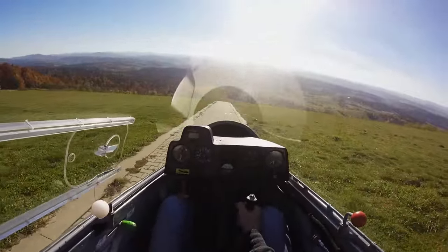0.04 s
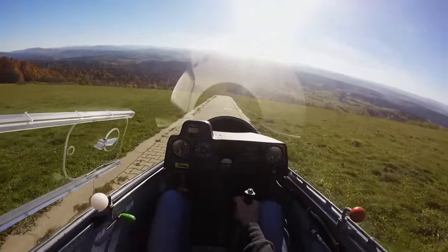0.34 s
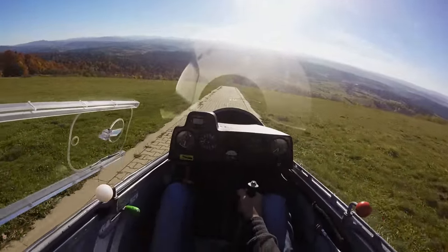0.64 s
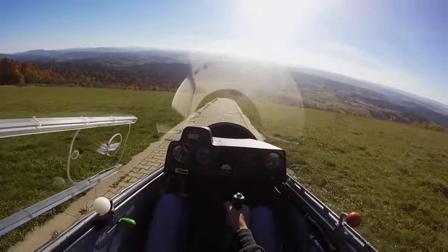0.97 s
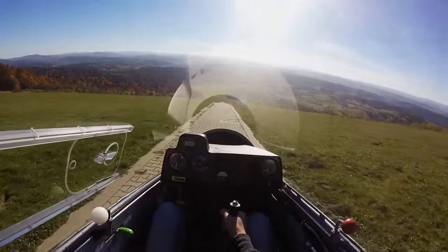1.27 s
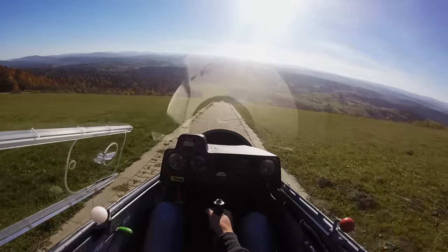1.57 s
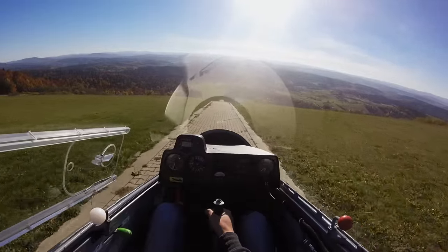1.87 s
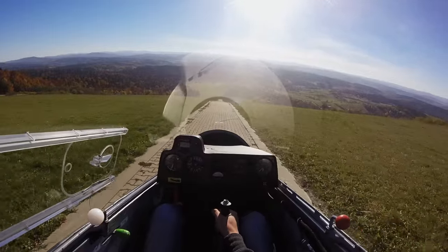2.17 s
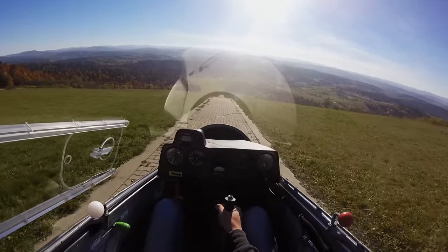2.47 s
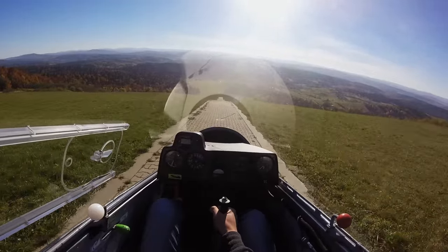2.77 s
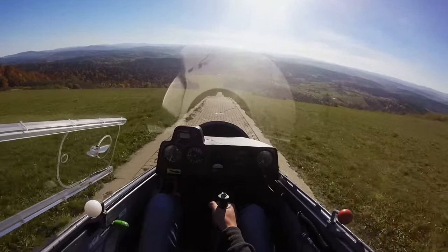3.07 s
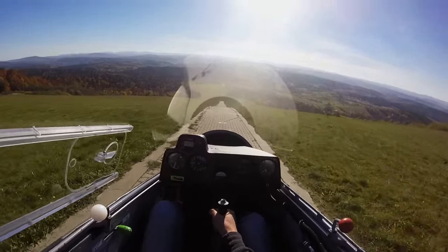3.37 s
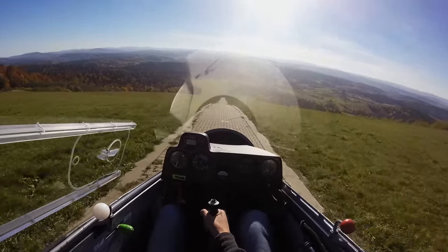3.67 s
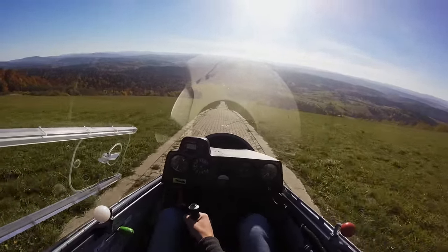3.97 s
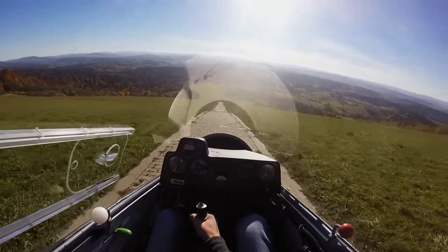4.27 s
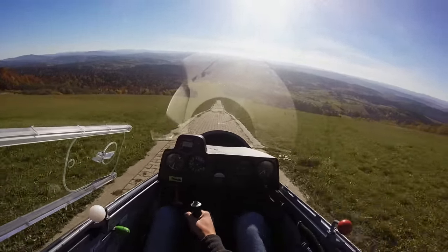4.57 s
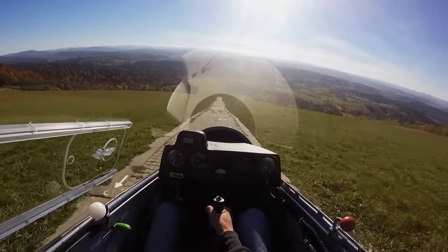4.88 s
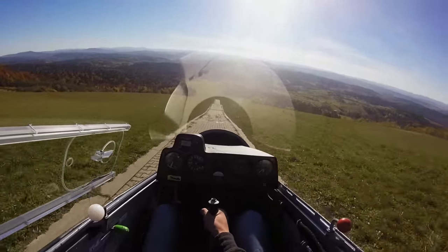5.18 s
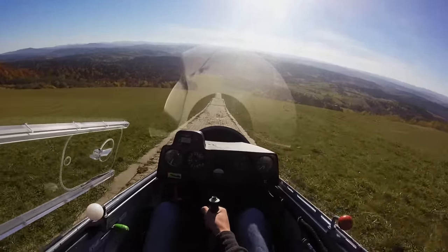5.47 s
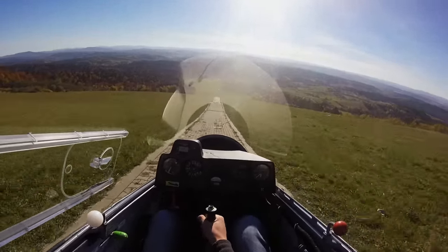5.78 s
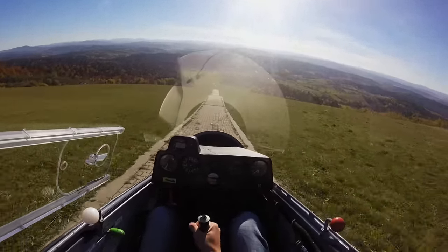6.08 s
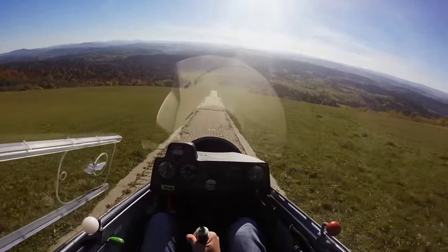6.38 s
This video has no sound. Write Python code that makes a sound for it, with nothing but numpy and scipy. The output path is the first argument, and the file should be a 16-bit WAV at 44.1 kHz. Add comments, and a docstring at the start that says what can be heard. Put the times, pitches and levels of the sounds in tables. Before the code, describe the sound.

From the pilot's seat, a glider's takeoff run on turf is a deep, boxy rumble with a wheel hum that rises as it speeds up. A quick, uneven series of knocks and rattles shakes the shell at first, with brief chirps from the joints. After a heavy jolt midway, the ride turns to softer thumps and light rod clicks, with one more sharp knock late on. A faint hiss of grass and wind lies underneath.

```python
"""A glider's wheel rolls ever faster over bumpy grass, heard from inside the cockpit.
The turf forces the hollow hull into resonance, and the uneven tyre drones at a rising pitch.
On bumps, impacts excite the modes of the nose and of a loose fitting, and joints squeak by stick-slip.
Control rods clack, a small metal part jingles, and a thin trill sounds early in the roll.
Behind it all, grass and air hiss past the shell as broadband noise."""
import sys
import numpy as np
from scipy import signal
from scipy.fft import rfft, irfft
from scipy.io import wavfile
from scipy.ndimage import uniform_filter1d, minimum_filter1d

SR = 44100
rng = np.random.default_rng(int(sys.argv[2]) if len(sys.argv) > 2 else 0)


def bounce(signal):
    """Save signal as a 16-bit WAV file at the path given by the first command-line argument."""
    frames = np.transpose(np.atleast_2d(signal))
    limited = np.clip(frames, -1, 1)
    pcm = np.round(limited * 32767).astype(np.int16)
    wavfile.write(sys.argv[1], SR, pcm)


N = 288414
T = np.arange(N) / SR

# Rotation of the wheel: time_s, rate_hz
WHEEL_SPEED = [(0, 14), (1, 16), (2, 20.8), (2.8, 23.2), (3.5, 26.2), (4.2, 28.8), (5, 32.3), (5.9, 36.9),
               (6.54, 41.4)]
# Unevenness of the tyre: harmonic_number, level_db
TYRE_HARMONICS = [(2, 0.5), (3, -1.5), (4, -2), (5, -15), (6, -15), (7, -4.5), (9, -1)]
# Response of the fuselage to the tyre: frequency_hz, gain_db
FUSELAGE_RESPONSE = [(28, -10.5), (50, -8.5), (57, -1), (64, -2), (72, -6), (80, -14), (98, -19.5),
                     (110, -3), (125, 0.5), (140, -8.5), (165, -6), (190, -20), (232, -3.5), (246, -8),
                     (253, 0), (260, 1), (266, -9), (370, -27.5)]
# Roughness of the turf: time_s, level_db
TURF_ROUGHNESS = [(0, 5), (.4, 3), (.65, 3.5), (.92, -3.5), (1.5, 3), (2.1, 1), (2.6, 3), (3.28, 3.5),
                  (3.55, 3.5), (4.1, 2.5), (4.45, 3), (4.75, 1), (5.1, 2), (5.7, 3), (6.1, 0.5), (6.54, 2)]
# Drumming of the floor and rush of air: time_s, floor_db, air_db
FLOOR_AND_AIR = [(0, -23.5, -45.5), (.8, -26.5, -46.5), (1.1, -29, -52), (1.6, -27.5, -50),
                 (2.3, -25, -49.5), (3, -26.5, -48.5), (3.7, -24, -45), (4.3, -24.5, -45.5),
                 (5, -25.5, -48), (5.8, -27.5, -45.5), (6.54, -26.5, -45.5)]
# Hollows that unload the wheel: centre_s, half_length_s, depth_db
HOLLOWS = [(2.83, .02, 7), (3.147, 0.028, 8.5), (3.302, 0.031, 10.5), (3.82, 0.034, 3), (3.947, 0.011, 8),
           (4.308, 0.03, 6), (5.09, 0.03, 7.5), (5.507, .025, 4), (5.76, 0.063, 2), (6.12, 0.017, 3),
           (6.29, 0.023, 4)]
# Soft hummocks under the main wheel: start_s, length_s, hull_db, cabin_db, walls_db, grass_db
HUMMOCKS = [(0.647, 0.024, -18, -20, -19, -62), (2.893, 0.049, -10, -42, -19, -90),
            (3.702, 0.024, -18, -35, -10.5, -65), (3.865, 0.018, -12.5, -32, -15.5, -61),
            (3.976, 0.22, -21, -30, -19, -63), (4.587, 0.042, -15.5, -23, -17, -55),
            (4.71, 0.02, -12.5, -15, -30, -53), (5.563, 0.052, -21, -16, -40, -57.5),
            (6.24, 0.016, -15.5, -30, -31, -64.5), (6.324, 0.069, -19, -26, -17, -62)]
# Hard bumps that bring the nose down:
# start_s, length_s, hull_db, cabin_db, walls_db, grass_db, judder_db, buzz_lead_s, buzz_db
BUMPS = [(0.011, 0.011, -26, -15.5, -38, -47, -21.5, 0.019, -27),
         (0.214, 0.11, -14.5, -24.5, -27.5, -57, -28.5, 0.063, -36),
         (0.472, 0.043, -14.5, -20, -18, -54.5, -30, 0.03, -42),
         (0.587, 0.046, -28, -17, -39, -51, -25.5, .003, -34.5),
         (0.768, 0.042, -11.5, -14.5, -17.5, -56.5, -21, 0.0071, -30),
         (0.955, 0.056, -15, -20, -28, -61, -27.5, 0.032, -45.5),
         (1.148, 0.033, -21, -19, -18.5, -48.5, -21, 0.0061, -39),
         (1.343, 0.032, -19, -17, -38, -52.5, -23, 0.055, -37),
         (1.624, 0.055, -15, -16, -21, -53, -27.5, 0.039, -36),
         (1.884, 0.059, -15.5, -22, -20, -51, -21, 0.037, -36.5),
         (2.216, 0.044, -25, -18, -20, -51, -24, 0.036, -33.5),
         (2.444, 0.15, -16.5, -39.5, -20.5, -57, -29, .003, -36.5),
         (2.689, 0.069, -11.5, -23, -40, -55.5, -24, 0.029, -34),
         (3.367, 0.041, -8, -23, -21, -48.5, -23, .004, -31),
         (5.239, 0.07, -28, -11.5, -15, -54.5, -22, 0.027, -35.5)]

# Resonances of each part or sound: frequency_hz, bandwidth_hz, gain_db
HULL_MODES = [(29, 6.5, -10), (45.7, 22, -3), (55.2, 19.7, 4)]
CABIN_MODES = [(122.5, 37, -1), (140.8, 20, -6.5), (164.8, 26, -5.5)]
WALL_MODES = [(226.9, 16.6, 2), (252.8, 13.7, 4), (286.1, 38, -5)]
FLOOR_MODES = [(379.3, 38, 7), (421, 17, 8.5), (502.7, 59.4, 8), (550.4, 45, 4), (642, 60.4, 6),
               (591, 8.7, 9.5), (791, 20, -12), (984, 23, -13.5)]
NOSE_MODES = [(408, 39, -10), (486, 93, -14.5), (603, 36, -1), (637.4, 20, 2), (700.5, 22, -0.5),
              (764, 16, -9.5)]
SHELL_CREAK_MODES = [(1520, 410, 1), (2023, 160, 3.5), (3440, 190, -19.5)]
SHELL_CRACK_MODES = [(882, 33, 13.5), (1017, 91, 6), (1440, 310, -6), (1740, 130, -5.5), (2350, 360, -14.5)]
FITTING_MODES = [(990, 150, -17.5), (1108, 41, 9.5), (1149, 15, 4), (2050, 84, -11.5)]
ROD_MODES = [(1560, 510, -2.5), (1950, 380, 27.5), (2160, 270, 1), (3200, 920, 8.5), (3506, 80, 20),
             (3920, 450, -0.5), (4140, 320, 12), (6460, 350, -1)]
METAL_MODES = [(4300, 470, 2), (6200, 150, 11.5), (8100, 940, 5.5), (9800, 1200, -4.5), (10860, 220, -9.5),
               (11500, 310, -20.5), (12300, 800, -15)]
TRILL_MODES = [(6460, 270, -18), (10700, 330, -6), (11200, 300, -9)]
BEARING_MODES = [(5590, 300, 0)]

# Knocks of the nose, some of them faint: start_s, level_db, tuning_ratio
KNOCKS = [(.028, -15, 1.07), (.063, -24.5, 1.15), (.216, -13.5, 0.92), (.270, -19.5, 1.08),
          (.295, -16.5, 0.92), (.488, -18, 1), (.588, -14.5, 1), (.768, -14, 0.97),
          (.789, -10.5, 0.94), (.960, -12, 0.95), (1.152, -12.5, 0.92), (1.347, -13.5, 1.07),
          (1.627, -17, 1), (1.635, -17, 1.06), (1.888, -14.5, 0.96), (2.222, -22, 1.2),
          (2.449, -17, 1.01), (2.702, -15, 1.06), (2.732, -18.5, 1), (3.273, -27, 0.96),
          (3.345, -26, 1.2), (3.367, -16, 0.95), (3.381, -10.5, 0.97), (3.405, -21, 1.1),
          (3.716, -23.5, 1), (5.247, -14.5, 0.86), (5.266, -25, 1.24), (5.277, -15, 1.14)]
# Taps of the fitting on its stop: start_s, level_db
TAPS = [(0.217, -36), (0.588, -37), (.763, -33), (0.789, -29.5), (0.935, -47), (1.294, -41), (1.626, -34),
        (1.843, -37), (1.919, -30), (2.186, -36), (2.221, -33), (2.438, -44), (2.703, -35), (2.727, -29.5),
        (3.367, -31), (3.385, -25.5), (5.247, -33), (5.277, -36)]
# Slips of the joints: peak_s, half_length_s, pitch_hz, level_db, overtones_db
SQUEAKS = [(0.866, 0.0078, 652, -17, -10), (1.696, 0.0048, 675, -15, -3), (2.06, 0.0088, 700, -12.5, 0.5),
           (3.973, 0.007, 1400, -49, -13), (4.087, 0.0045, 1340, -35.5, 0.5),
           (4.329, 0.0043, 1320, -39, -6), (4.451, 0.0032, 1380, -38, 0), (5.614, 0.0091, 1346, -44, -1),
           (6.376, 0.007, 1390, -40.5, -4)]
# Spectrum of a squeak: harmonic_number, level_db
SQUEAK_HARMONICS = [(1, 3), (2, -21), (3, -21), (4, -37.5), (5, -43)]
# Clacks of the control rods: start_s, length_s, level_db
CLACKS = [(.322, 0.084, -47.5), (.434, 0.0042, -44), (.796, .008, -52), (1.004, .0049, -44),
          (1.062, .02, -47.5), (1.168, 0.02, -40.5), (1.197, 0.0069, -35.5), (1.257, 0.004, -30.5),
          (1.672, 0.0043, -35), (1.732, 0.004, -35), (1.922, 0.011, -50), (2.224, 0.046, -44.5),
          (2.757, 0.0036, -41.5), (2.917, 0.0047, -43), (2.982, .004, -55), (3.198, .008, -49),
          (3.333, .004, -55), (3.381, 0.008, -41), (3.439, .0046, -30.5), (3.496, 0.0091, -34),
          (3.56, 0.0033, -40.5), (3.627, 0.025, -47.5), (3.912, 0.0074, -44), (4.179, .005, -49),
          (4.259, 0.007, -47.5), (4.401, 0.0064, -51), (4.498, 0.0052, -43), (4.664, .005, -50.5),
          (4.77, .006, -50), (4.955, .02, -51.5), (5.247, 0.0065, -34), (5.276, .005, -44),
          (5.335, 0.011, -46.5), (5.413, .005, -48), (5.477, 0.0041, -46.5), (5.762, 0.014, -49),
          (6.16, 0.0064, -43), (6.37, 0.026, -46)]
# Jingles of the metal part: start_s, level_db
JINGLES = [(.075, -64), (0.383, -58), (.435, -58), (1.177, -54), (1.259, -57), (1.385, -64), (2.25, -65),
           (3.546, -62), (4.497, -57), (4.597, -63), (5.142, -63), (5.379, -60)]
# Spectra of scratching grass and of air past the canopy: frequency_hz, density_db
GRASS_SPECTRUM = [(900, -8), (1700, -1), (2100, 12), (2550, 0), (3500, 1), (4200, -3.5), (4700, -11),
                  (6400, -11), (7400, -17), (11000, -27.5), (16000, -52)]
AIR_SPECTRUM = [(600, -1), (1000, 2.5), (1200, -3), (1360, 3.5), (1850, -1.5), (2200, -3.5), (2480, -10),
                (2750, -15.5), (3300, -14.5), (6100, -26), (6500, -22), (7100, -30), (11000, -34),
                (16000, -63.5)]
# Rubbing of the wheel bearing: time_s, level_db
BEARING_LEVEL = [(0, -86), (1.7, -81), (2.2, -72), (3.8, -72), (4.5, -76), (6.54, -80)]

REFERENCE_HZ = 27.9   # wheel rate at which speed adds 0 dB
# Response to speed and turf: base_db, speed_doubling_db, roughness_share
HULL_LAW, CABIN_LAW, WALLS_LAW = (-22.5, 0.97, 1), (-21.5, 4.2, 0.62), (-21, 4.3, 0.82)
GRASS_LAW, DRONE_LAW = (-65, -0.8, 0.58), (-19.5, 4.3, 0.28)
# Envelope of a jolt: delay_s, rise_s, fade_s
HULL_SWELL, SHELL_SWELL, GRASS_SWELL = (0.05, 0.036, 0.012), (0.025, 0.015, 0.01), (0.018, 0.039, 0.058)


def rolling_wheel(wheel_hz, hull_db, cabin_db, walls_db, floor_db):
    """Forced vibration: tufts kick the wheel and the airframe resonates; tyre and bearing sound too."""
    wheel_angle = 2 * np.pi * np.cumsum(wheel_hz * (1 + 0.00497 * drift(14))) / SR
    kicks = rms_one(grains(45 * wheel_hz, spread_db=4.5))
    # Each heave of the hull shakes the whole airframe harder.
    load_db = 0.14 * (hull_db - uniform_filter1d(hull_db, size=SR // 3))
    hull = steady(band(resonate(kicks, HULL_MODES), 25.4, 74.1, order=4), span_s=0.065)
    cabin = steady(band(resonate(kicks, CABIN_MODES), 104.6, 183.2, order=4), span_s=0.074)
    walls = steady(band(resonate(kicks, WALL_MODES), 205, 322.3, order=4), span_s=0.091)
    tyre_slaps = grains(22 * wheel_hz, spread_db=4) * from_db(3.2 * np.cos(wheel_angle))
    floor = steady(band(resonate(tyre_slaps, FLOOR_MODES), 272, 1055, order=6), span_s=0.044)
    rumble = (from_db(hull_db - 0.5) * hull
              + from_db(cabin_db + load_db - 1.9) * cabin
              + from_db(walls_db + load_db - unloading_db() - 0.83) * walls
              + from_db(floor_db + load_db) * floor)
    return rumble + tyre_drone(wheel_angle, wheel_hz) + bearing_chirp(wheel_angle)


def tyre_drone(wheel_angle, wheel_hz):
    """Periodic forcing: each harmonic of the uneven tyre swells as it crosses a fuselage resonance."""
    response_hz, response_db = np.transpose(FUSELAGE_RESPONSE)
    tone = 0
    for harmonic, db in TYRE_HARMONICS:
        wavering_db = db + np.interp(harmonic * wheel_hz, response_hz, response_db) + 2.9 * drift(14)
        tone += from_db(wavering_db) * np.sin(harmonic * wheel_angle + rng.uniform(0, 2 * np.pi))
    level_db = shaking_db(DRONE_LAW, wheel_hz) - 0.76 * unloading_db()
    return from_db(level_db) * np.sqrt(2) * tone


def ride_levels_db(wheel_hz):
    """Incoherent addition: shaking and jolts sum in power, for hull, cabin, walls and grass in turn."""
    parts = [(HULL_LAW, HULL_SWELL), (CABIN_LAW, SHELL_SWELL),
             (WALLS_LAW, SHELL_SWELL), (GRASS_LAW, GRASS_SWELL)]
    return [10 * np.log10(from_db(shaking_db(law, wheel_hz)) ** 2 + jolt_power(part, *swell))
            for part, (law, swell) in enumerate(parts)]


def shaking_db(law, wheel_hz):
    """Power law: steady vibration scales with speed, and grows with the roughness of the turf."""
    base_db, doubling_db, roughness_share = law
    turf_db, = in_time(TURF_ROUGHNESS)
    return base_db + doubling_db * np.log2(wheel_hz / REFERENCE_HZ) + roughness_share * turf_db


def jolt_power(part, delay_s, rise_s, fade_s):
    """Transient response: at each bump or hummock a part's vibration swells, holds and decays."""
    power = 0
    for start_s, length_s, *levels_db in BUMPS + HUMMOCKS:
        t = T[::32] - start_s - delay_s
        swell = np.exp(-(np.minimum(t, 0) / rise_s) ** 2 / 2 - np.maximum(t - length_s, 0) / fade_s)
        power += (from_db(levels_db[part]) * swell) ** 2
    return np.interp(T, T[::32], power)


def unloading_db():
    """Reduced contact force: the hum sinks while the wheel skims a hollow."""
    return sum(depth_db * np.exp(-((T - centre_s) / half_s) ** 2 / 2)
               for centre_s, half_s, depth_db in HOLLOWS)


def nose_knocks(touch_lead_s=0.00468, rebound_s=0.0085):
    """Impulse response: three quick pulses ring the airframe's modes, heard as a knock or faint thud."""
    out = np.zeros(N)
    for start_s, db, tuning in KNOCKS:
        *mode_scatter, rebound_scatter = rng.standard_normal(len(NOSE_MODES) + 1)
        delays_s = np.array([0, touch_lead_s, touch_lead_s + rebound_s * np.exp(0.15 * rebound_scatter)])
        contacts = np.zeros(SR // 5)
        contacts[(delays_s * SR).astype(int)] = 0.4, 1, 0.79   # touch, blow, rebound
        nose_modes = [(hz * tuning, width_hz, gain_db + 2 * scatter)
                      for (hz, width_hz, gain_db), scatter in zip(NOSE_MODES, mode_scatter)]
        parts = [(band(ring(contacts, nose_modes), 388, 754.5, order=5), 0),
                 (band(ring(contacts, FLOOR_MODES), 254, 485), -8),
                 (band(ring(contacts, FITTING_MODES), 855, 1310), -27.5),
                 (resonate(contacts, SHELL_CRACK_MODES), crack_db(start_s))]
        for sound, part_db in parts:
            add(out, start_s - 0.001 - touch_lead_s, at_level(sound, db + part_db + 0.84, span_s=0.016))
    return out


def bump_judder(onset_s=0.012):
    """Repeated impact: bumps shake nose, floor, shell and rods; the flexing frame buzzes the fitting."""
    blows, buzzes = [], []
    for start_s, length_s, *_, judder_db, buzz_lead_s, buzz_db in BUMPS:
        blows.append((start_s + onset_s, max(length_s - onset_s, 0), judder_db))
        buzzes.append((start_s - buzz_lead_s, buzz_lead_s + length_s, buzz_db))
    cracks = [(start_s, length_s, db + crack_db(start_s)) for start_s, length_s, db in blows]
    nose = chatter(blows, lambda x: band(ring(x, NOSE_MODES), 372, 836, order=5),
                   per_s=260, first=0.27, rise_s=0.001, fade_s=0.027, lead_s=0.00017)
    thud = chatter(blows, lambda x: band(resonate(x, FLOOR_MODES), 282, 483),
                   per_s=560, first=1, rise_s=0.0011, fade_s=0.034, lead_s=-0.002)
    creak = chatter(blows, lambda x: resonate(x, SHELL_CREAK_MODES),
                    per_s=560, first=0.59, rise_s=0.004, fade_s=0.043, lead_s=0.001993)
    crack = chatter(cracks, lambda x: resonate(x, SHELL_CRACK_MODES),
                    per_s=300, first=0.9, rise_s=0.0025, fade_s=0.015, lead_s=-0.0017)
    rods = chatter(blows, lambda x: band(ring(x, ROD_MODES), 2000, 6800, order=5),
                   per_s=240, first=0.24, rise_s=0.0061, fade_s=0.016, lead_s=-0.0045)
    buzz = chatter(buzzes, lambda x: band(ring(x, FITTING_MODES), 920, 1340, order=4),
                   per_s=150, first=0.7, rise_s=0.001, fade_s=0.0025, lead_s=0.001)
    return (from_db(-2.5) * nose + from_db(-4.5) * thud + from_db(-20.5) * creak
            + crack + from_db(-39) * rods + from_db(-3) * buzz)


def crack_db(time_s, doubling_db=8):
    """Power law: the faster the roll, the louder the shell cracks relative to the blow."""
    wheel_hz = np.interp(time_s, *np.transpose(WHEEL_SPEED))
    return -19.5 + doubling_db * np.log2(wheel_hz / REFERENCE_HZ)


def fitting_taps():
    """Impact and rebound: the loose fitting hits its stop, bounces and rings."""
    taps = [(start_s, 0.006, db) for start_s, db in TAPS]
    return chatter(taps, lambda x: band(ring(x, FITTING_MODES), 900, 2570),
                   per_s=180, first=1.6, rise_s=0.003, fade_s=0.0047, lead_s=0.00064)


def joint_squeaks():
    """Stick-slip friction: joints give short chirps that sag in pitch, with fluttering overtones."""
    out, waver, flutter = np.zeros(N), drift(320), drift(500)
    t = np.arange(-SR // 20, SR // 20) / SR
    for peak_s, half_s, pitch_hz, db, overtones_db in SQUEAKS:
        phase = 2 * np.pi * pitch_hz * (t - 0.5 * t * t) + 0.3 * np.interp(peak_s + t, T, waver)
        overtone_gain = from_db(overtones_db) * (1 + 0.45 * np.interp(peak_s + t, T, flutter))
        tone = sum(from_db(level_db) * np.sin(k * phase) * (overtone_gain if k > 1 else 1)
                   for k, level_db in SQUEAK_HARMONICS)
        envelope = np.exp(-(t / half_s) ** 2 / 2)
        add(out, peak_s + t[0], from_db(db) * envelope * tone)
    return out


def rod_clacks():
    """Contact excitation: control rods scrape and strike their guides, and ring at their modes."""
    return chatter(CLACKS, lambda x: band(ring(x, ROD_MODES), 1200, 7030, order=6),
                   per_s=2500, first=0.29, rise_s=0.0007, fade_s=0.01, lead_s=0.001)


def metal_jingles():
    """Modal ringing: dense, light contacts excite the high modes of a small metal part."""
    jingles = [(start_s, 0.007, db) for start_s, db in JINGLES]
    return chatter(jingles, lambda x: band(ring(x, METAL_MODES), 3000, 13000),
                   per_s=6200, first=0.3, rise_s=0.002, fade_s=0.015, lead_s=0.00073)


def grass_swish(grass_db, wheel_hz):
    """Shot noise: blades of grass flick the belly in clumps, more often with speed."""
    clumps_db = 6.6 * np.minimum(drift(70), 1) + 1.2 * drift(11)
    blades = grains(400 * wheel_hz, spread_db=7) * from_db(clumps_db)
    scratch = cockpit_echoes(coloured(blades, GRASS_SPECTRUM), wet=0.57, fade_s=0.0044)
    return from_db(grass_db + 6) * rms_one(scratch)


def air_rush(air_db):
    """Flow noise: air passing the canopy makes a finely fluttering hiss."""
    flutter_db = 2.2 * drift(110)
    return from_db(air_db + flutter_db) * coloured(rng.standard_normal(N), AIR_SPECTRUM)


def thin_trill(start_s=0.32, gap_s=0.036, level_db=-68.8, count=11):
    """Pulse train: nearly even bursts through high resonances are heard as a trill."""
    pulses = [(start_s + gap_s * (k + 0.16 * late), 0.01, level_db + 1.5 * size)
              for k, (late, size) in enumerate(rng.standard_normal((count, 2)))]
    return chatter(pulses, lambda x: resonate(x, TRILL_MODES),
                   per_s=3000, first=0.3, rise_s=0.003, fade_s=0.004, lead_s=0.00043)


def bearing_chirp(wheel_angle):
    """Modulated friction: a dry spot rubs once a turn, catching unevenly, and rings faintly."""
    level_db, = in_time(BEARING_LEVEL)
    rub = rng.standard_normal(N) * from_db(4 * np.cos(wheel_angle) + 4.5 * np.minimum(drift(17), 1))
    return from_db(level_db) * rms_one(resonate(rub, BEARING_MODES))


def cockpit_echoes(x, wet, fade_s):
    """Early reflections between canopy and shell give a boxy colour."""
    t = T[:SR // 25]
    echoes = rng.standard_normal(len(t)) * np.exp(-t / fade_s) * (t > 0.001)
    reflected = signal.fftconvolve(x, echoes / np.sqrt(np.sum(echoes ** 2)))[:N]
    return (x + wet * reflected) / np.hypot(1, wet)


def chatter(events, body, per_s, first, rise_s, fade_s, lead_s):
    """Source and filter: a strike of strength `first`, then bounces that build and settle, ring `body`."""
    out, t = np.zeros(N), T[:SR // 4]
    for start_s, length_s, db in events:
        gaps = rng.uniform(0.2, 1.8, 2000)
        strengths = rng.uniform(0.3, 1.5, 2000) * rng.choice([-1, 1], 2000)
        at_sample = (np.cumsum(gaps) * SR / per_s).astype(int)
        contacts = np.bincount(np.minimum(at_sample, len(t)), strengths, len(t) + 1)[:-1]
        contacts *= 1 - np.exp(-t / rise_s)
        contacts[0] = first
        settling = np.exp(-np.maximum(t - length_s, 0) / fade_s)
        add(out, start_s - lead_s, at_level(body(contacts * settling), db, span_s=length_s + fade_s))
    return out


def resonate(x, modes):
    """Parallel resonance: each filter acts twice, so the valleys between modes stay deep."""
    out = 0
    for hz, width_hz, db in modes:
        r = np.exp(-np.pi * width_hz * np.sqrt(2) / SR)
        section = [(1 - r * r) / 2, 0, (r * r - 1) / 2, 1, -2 * r * np.cos(2 * np.pi * hz / SR), r * r]
        out += from_db(db) * signal.sosfilt([section, section], x + 1e-18)
    return out


def ring(x, modes):
    """Damped free vibration: struck modes start in phase, giving a hard attack."""
    out = 0
    for hz, width_hz, db in modes:
        r = np.exp(-np.pi * width_hz / SR)
        feedback = [1, -2 * r * np.cos(2 * np.pi * hz / SR), r * r]
        out += from_db(db) * signal.lfilter([1 - r, 0, r - 1], feedback, x + 1e-18)
    return out


def grains(per_s, spread_db):
    """Random impulses: tiny independent contacts of bounded size and either sign."""
    sizes = from_db(spread_db * np.minimum(rng.standard_normal(N), 2)) * rng.choice([-1, 1], N)
    return sizes * (rng.random(N) < per_s / SR)


def drift(rate_hz):
    """Random modulation at rms 1, changing course `rate_hz` times a second."""
    knots = rng.standard_normal(4096)
    return rms_one(np.interp(T * rate_hz, np.arange(len(knots)), knots))


def coloured(x, spectrum):
    """Spectral shaping along a logarithmic frequency axis, at rms 1."""
    hz, db = np.transpose(spectrum)
    bin_hz = np.arange(N // 2 + 1) * SR / N
    gain = from_db(np.interp(np.log(bin_hz + 1), np.log(hz), db))
    return rms_one(irfft(rfft(x) * gain, N))


def band(x, low_hz, high_hz, order=3):
    return signal.sosfilt(signal.butter(order, [low_hz, high_hz], "band", fs=SR, output="sos"), x)


def steady(x, span_s):
    """Envelope division holds the running rms at 1."""
    power = np.maximum(uniform_filter1d(x * x, int(span_s * SR) + 1), 0)
    return x / np.sqrt(power + 1e-6 * np.mean(x * x))


def at_level(x, db, span_s):
    """Equivalent level: the sound's energy, spread over `span_s`, gives `db`."""
    return from_db(db) * x / np.sqrt(np.sum(x ** 2) / (span_s * SR))


def in_time(rows):
    """Linear interpolation of a table's columns at every sample."""
    time_s, *columns = np.transpose(rows)
    return [np.interp(T, time_s, column) for column in columns]


def from_db(db):
    return 10 ** (np.asarray(db) / 20)


def rms_one(x):
    return x / np.sqrt(np.mean(x ** 2) + 1e-20)


def add(out, start_s, sound):
    start = max(int(start_s * SR), 0)
    out[start:start + len(sound)] += sound[:max(N - start, 0)]


def scene():
    """Superposition: rumble, hiss, impacts, squeaks and rattles sum in one channel."""
    floor_db, air_db = in_time(FLOOR_AND_AIR)
    wheel_hz, = in_time(WHEEL_SPEED)
    hull_db, cabin_db, walls_db, grass_db = ride_levels_db(wheel_hz)
    rumble = rolling_wheel(wheel_hz, hull_db, cabin_db, walls_db, floor_db)
    hiss = grass_swish(grass_db, wheel_hz) + air_rush(air_db)
    impacts = nose_knocks() + bump_judder() + fitting_taps()
    squeaks = joint_squeaks()
    rattles = cockpit_echoes(rod_clacks() + metal_jingles(), wet=0.31, fade_s=0.0012)
    return (rumble + hiss + impacts + squeaks + rattles + thin_trill())[None]


def record(dry):
    """Peak limiting eases the loudest jolts down; a low-pass filter removes the highest treble."""
    ceiling, stopband_hz = 0.86, 15800
    gain = minimum_filter1d(np.minimum(1, ceiling / (np.abs(dry) + 1e-9)), size=801)
    gain = uniform_filter1d(uniform_filter1d(gain, size=401), size=401)
    return signal.sosfilt(signal.cheby2(12, 70, stopband_hz, fs=SR, output="sos"), dry * gain)


dry = scene()
out = record(dry)
bounce(out)
```